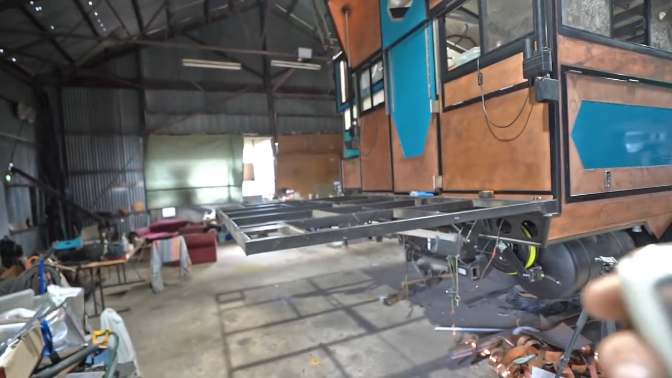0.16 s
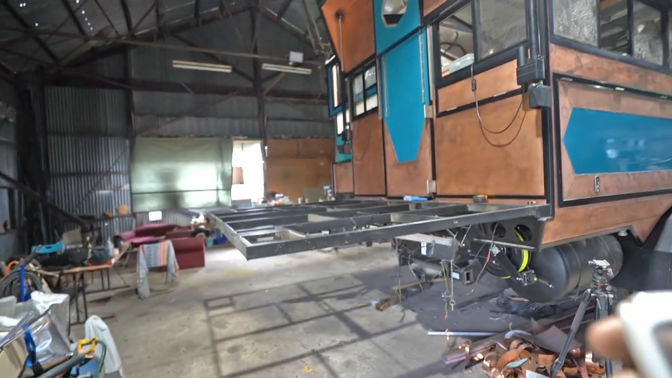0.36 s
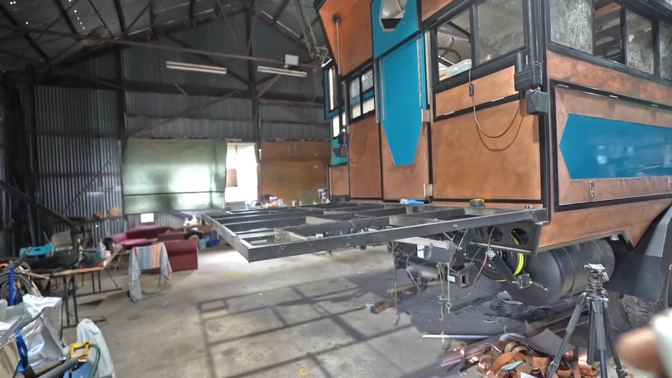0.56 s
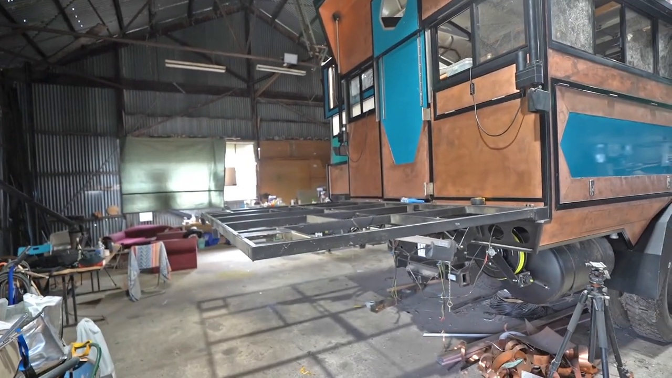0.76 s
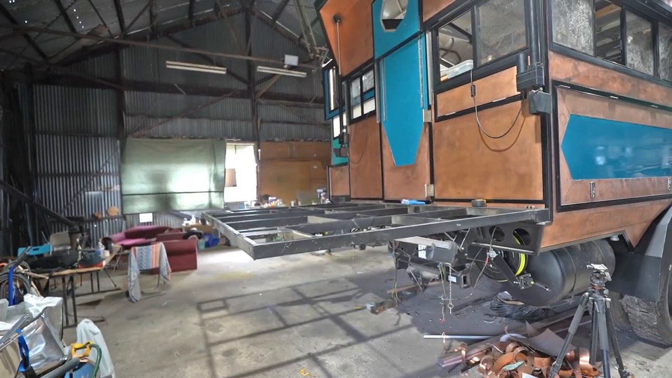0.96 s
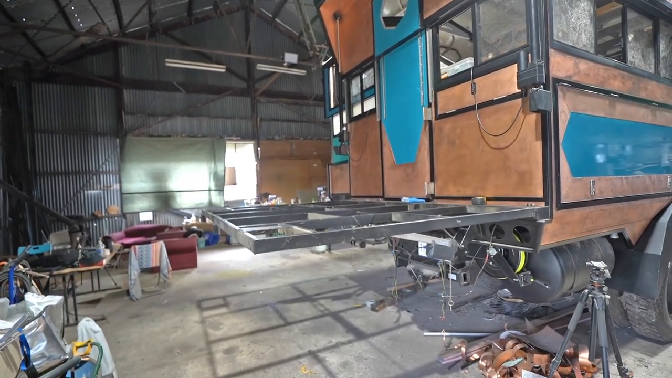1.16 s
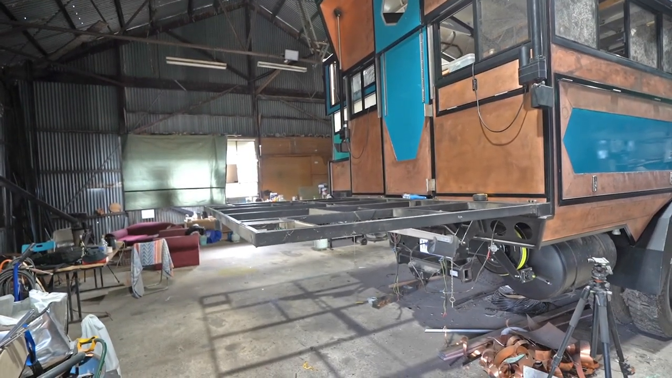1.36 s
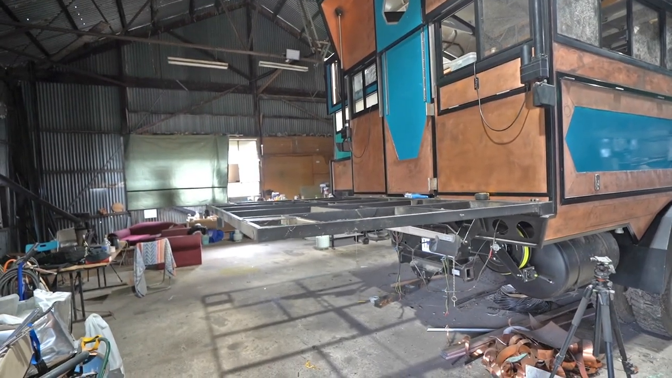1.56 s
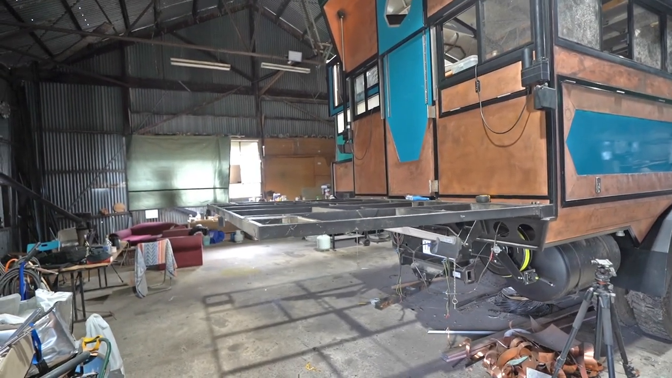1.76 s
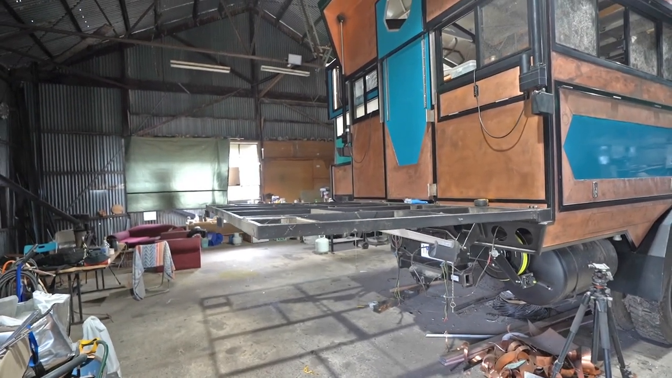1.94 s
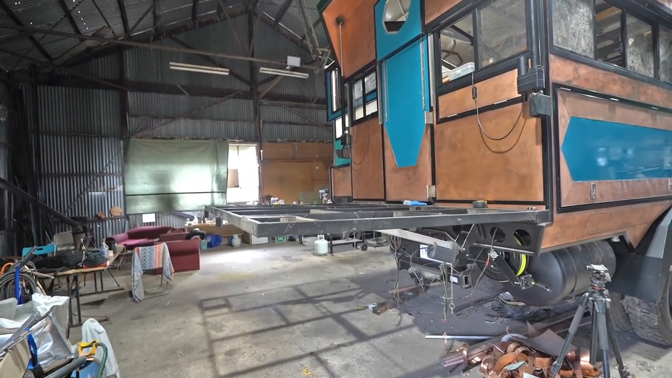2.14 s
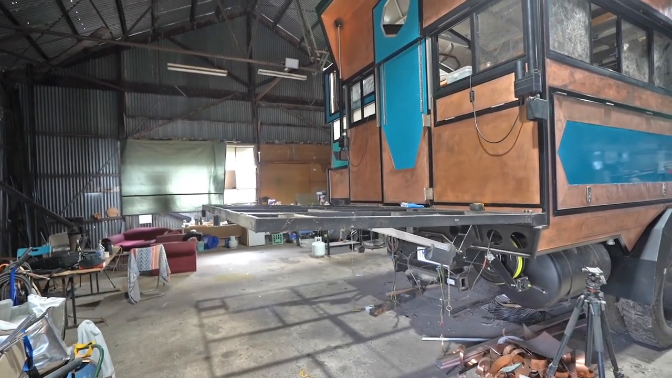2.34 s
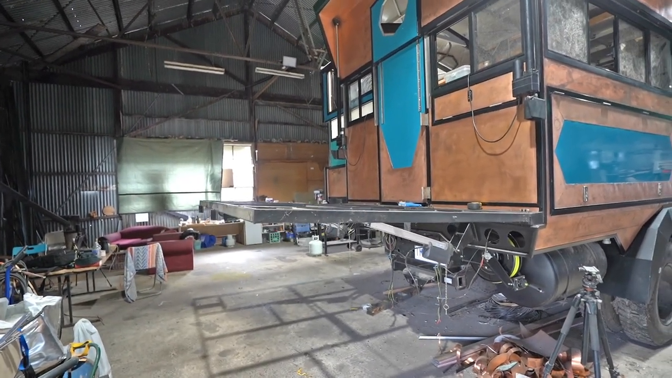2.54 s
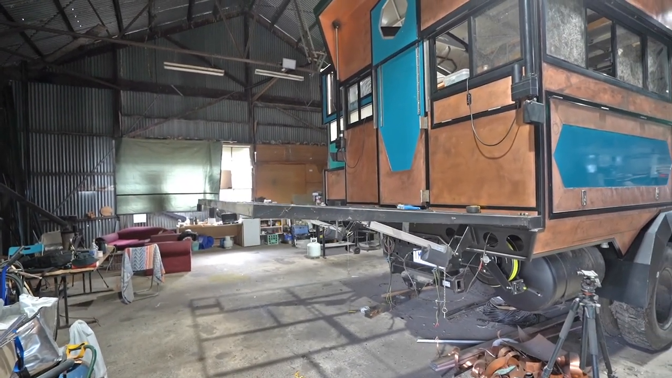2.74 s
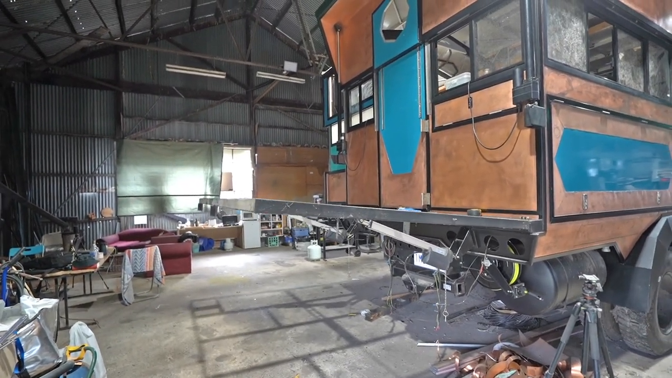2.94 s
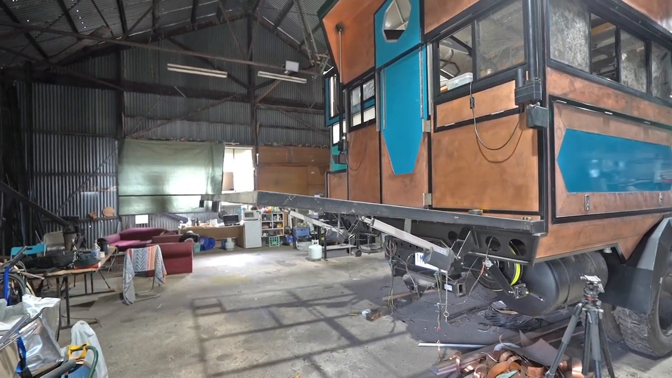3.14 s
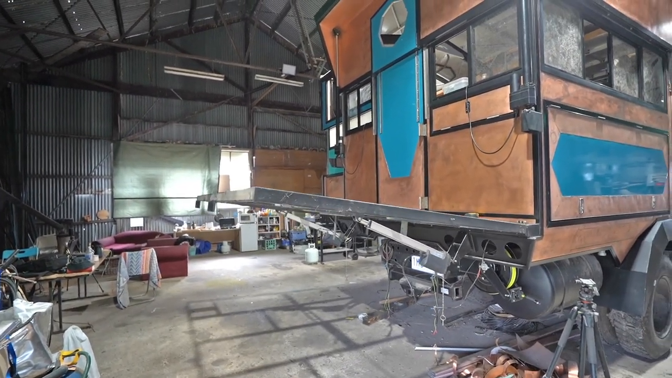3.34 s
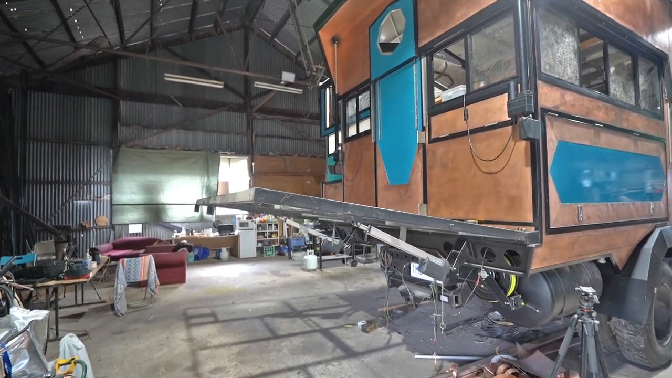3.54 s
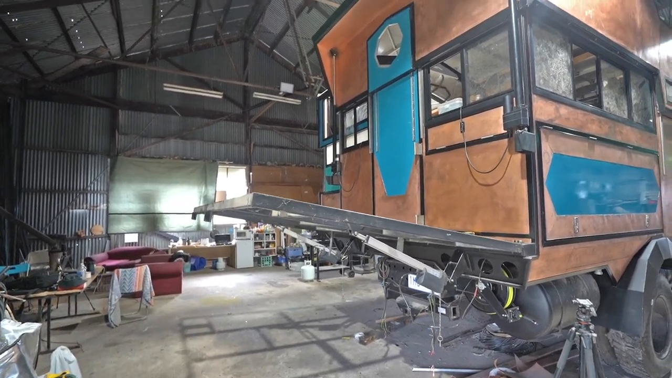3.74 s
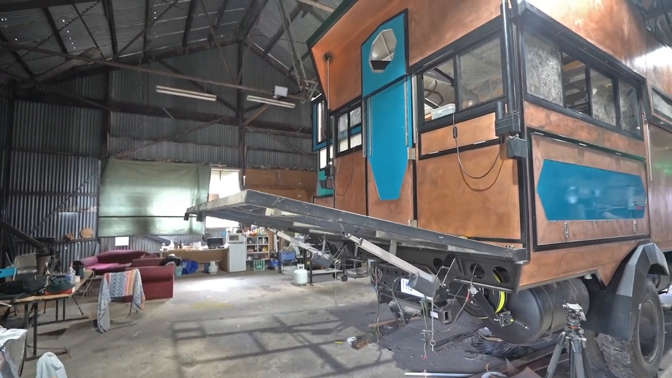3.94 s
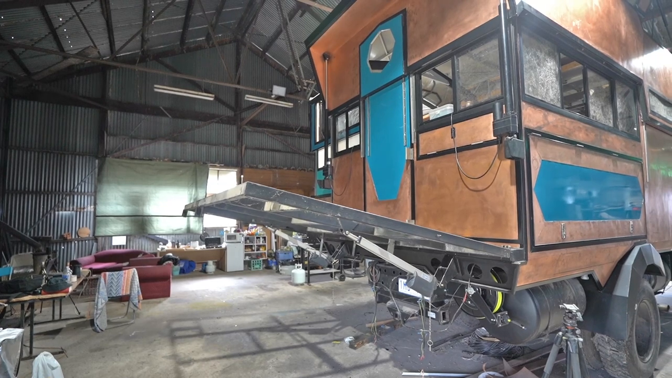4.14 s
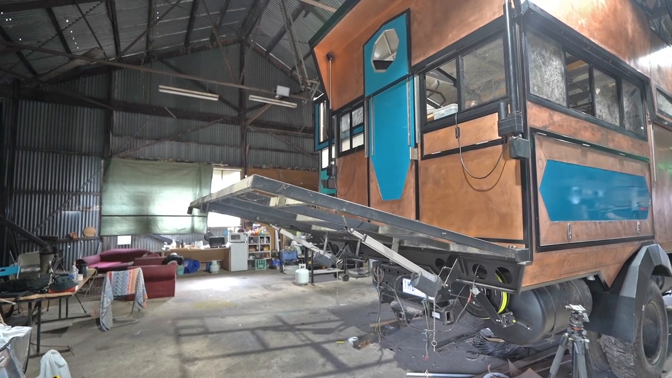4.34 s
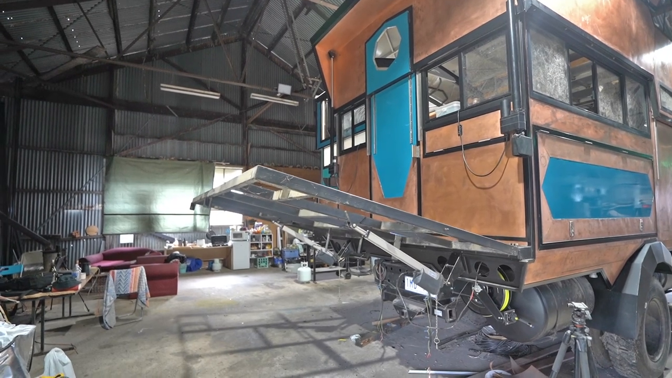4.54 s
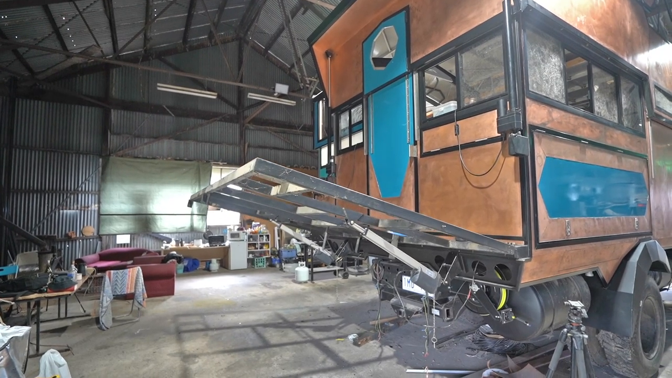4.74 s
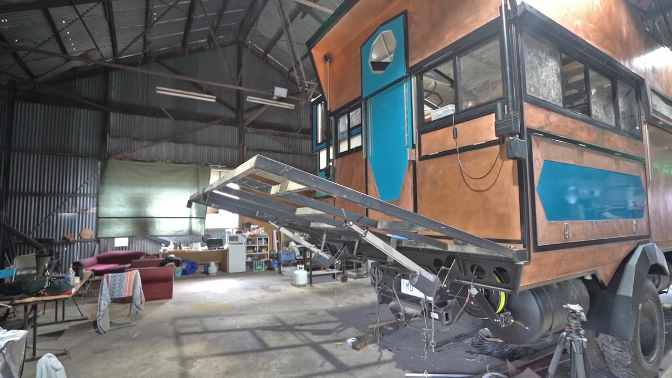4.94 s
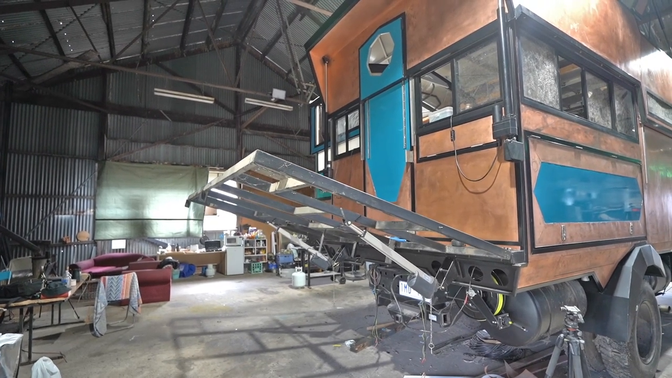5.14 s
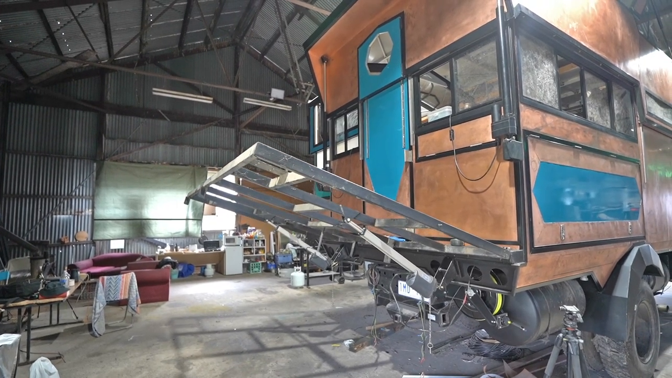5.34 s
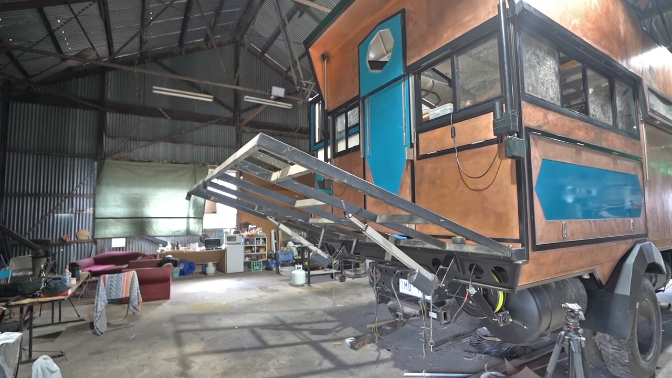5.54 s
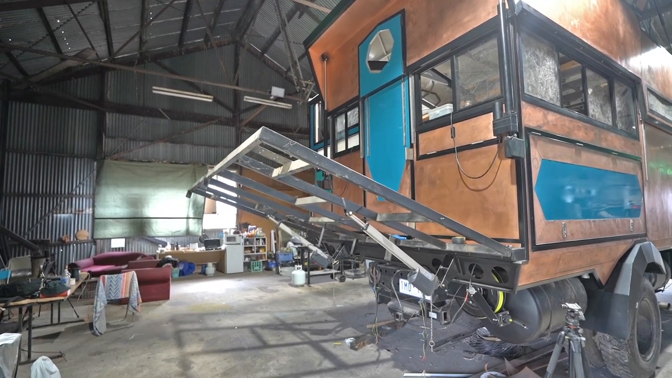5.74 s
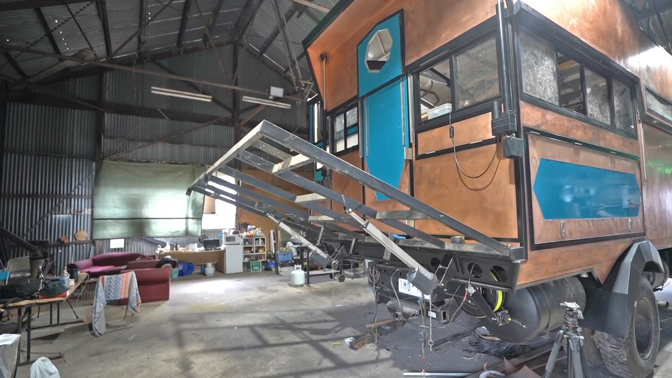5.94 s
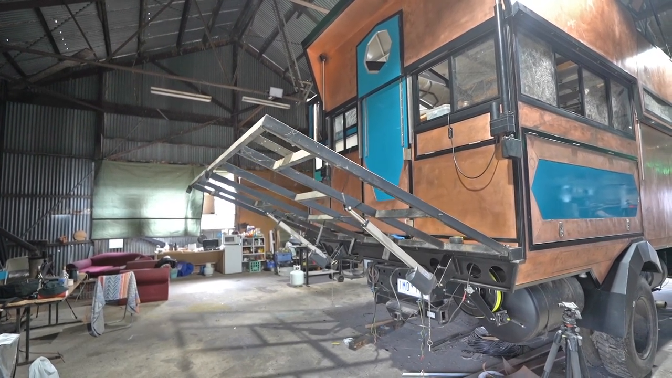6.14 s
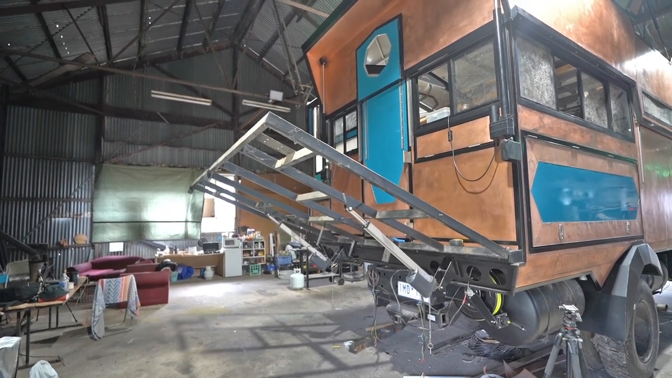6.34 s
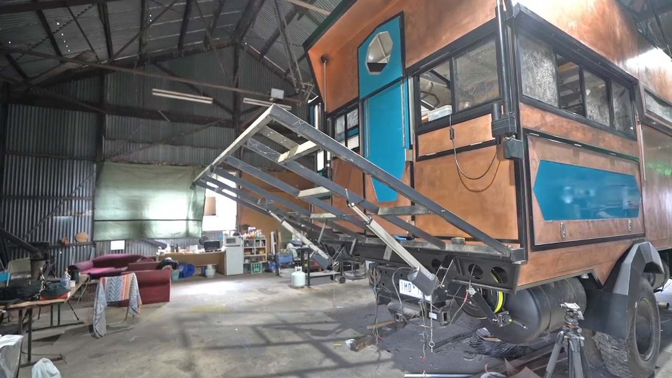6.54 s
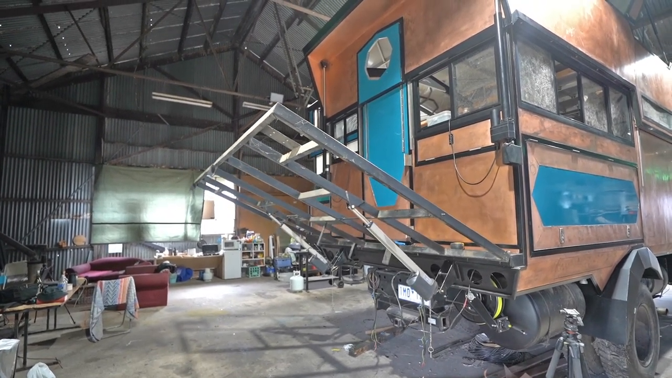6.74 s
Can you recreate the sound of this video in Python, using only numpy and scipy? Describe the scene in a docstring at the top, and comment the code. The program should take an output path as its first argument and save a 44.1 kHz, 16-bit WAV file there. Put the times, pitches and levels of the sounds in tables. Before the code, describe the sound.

Electric actuators click on, clank and spin up into a steady whine that jumps higher as they raise a steel frame.

```python
"""Two electric linear actuators spin up and raise a steel frame in a sheet-metal workshop.
Fingers rustle on a remote, a button and relays click, and the drive clanks into motion: gear teeth
whine through the ringing gearbox while brushes and lead screw rasp. Later the frame booms on its hinges.
Underneath lie rumbling air, a steady machine hum and a far engine slowing down.
From 2.245 s everything plays in fast-forward: twice the speed, one octave higher."""
import sys
import numpy as np
from scipy import signal
from scipy.fft import rfft, irfft, next_fast_len
from scipy.io import wavfile
from scipy.ndimage import map_coordinates

SR = 44100
rng = np.random.default_rng(int(sys.argv[2]) if len(sys.argv) > 2 else 0)


def dump(signal):
    """Clip the signal to [-1, 1] and save it as 16-bit WAV at the path in sys.argv[1]."""
    limited = np.clip(np.atleast_2d(signal).T, -1, 1)
    pcm = np.round(limited * 32767).astype(np.int16)
    wavfile.write(sys.argv[1], SR, pcm)


N = 303628

# Cue times and the beat rate are in playback time; pitches and decays are those at natural speed.
FAST_FROM_S = 2.245
CUT = round(FAST_FROM_S * SR)
LENGTH = CUT + 2 * (N - CUT)  # samples at natural speed
CLOCK = np.concatenate([np.arange(CUT), CUT + np.arange(LENGTH - CUT) / 2]) / SR  # playback time [s]


def amp(db):
    """Decibels to gain."""
    return 10 ** (np.asarray(db) / 20)


def unit(x):
    """Scale to rms 1."""
    return x / np.sqrt(np.mean(x ** 2) + 1e-20)


def along(points, hz):
    """Read (frequency [Hz], value) points on a log axis."""
    freqs, values = np.transpose(points)
    return np.interp(np.log(hz + 1), np.log(freqs + 1), values)


def curves(rows):
    """Automation: one value per sample for each column after the time."""
    times, *columns = np.transpose(rows)
    return [np.interp(CLOCK, times, column) for column in columns]


def wobble(rate):
    """A smooth random curve, rate knots a second."""
    knots = rng.standard_normal(int(LENGTH * rate / SR) + 4)
    coarse = np.arange(0, LENGTH, 64)
    return np.interp(np.arange(LENGTH), coarse, map_coordinates(knots, [coarse * rate / SR]))


def swell_at(s, length_s):
    """A smooth swell of height 1 around playback time s."""
    return np.exp(-(2 * (CLOCK - s) / length_s) ** 2)


def filtered(x, response):
    """Shape x by a gain that depends on frequency."""
    size = next_fast_len(len(x) + 8192, real=True)
    return irfft(rfft(x, size) * response(np.fft.rfftfreq(size, 1 / SR)), size)[:len(x)]


def eq(x, points):
    """Shape x by (frequency [Hz], level [dB]) points."""
    return filtered(x, lambda f: amp(along(points, f)))


def resonance(hz, width):
    """Response of one damped mode."""
    return lambda f: 1j * f * width / (hz * hz - f * f + 1j * f * width)


def burst(response, t60):
    """One second of coloured noise that dies away."""
    t = np.arange(SR) / SR
    return unit(filtered(rng.standard_normal(SR), response)) * np.exp(-np.log(1000) * t / t60)


def add(track, s, sound):
    """Mix a sound in at playback time s."""
    part = track[np.searchsorted(CLOCK, s):][:len(sound)]
    part += sound[:len(part)]


# room tone of the shed: (frequency [Hz], relative level [dB])
AIR_SPECTRUM = [(4, -1.5), (12, 7), (22, -0.5), (35, -13), (70, -10.5), (170, -16.5), (240, -10.5),
                (350, -17.5), (750, -20), (1400, -29), (2800, -38.5), (5600, -43.5), (10000, -50),
                (15000, -62)]


def room_air(level_db):
    """Still air lays a bed of low rumble."""
    return amp(level_db) * unit(eq(rng.standard_normal(LENGTH), AIR_SPECTRUM))


def machine_hum(hz, level_db):
    """A machine holds one low note, gently wavering in level."""
    return amp(level_db + 1.8 * wobble(1.57)) * unit(np.sin(2 * np.pi * hz * np.arange(LENGTH) / SR))


# the engine's wind-down: (time [s], firing rate [Hz], level [dB])
ENGINE_SLOWDOWN = [(2.4, 65.6, -62), (4.1, 62.9, -52), (5.2, 59.89, -54), (5.9, 56.42, -46.5),
                   (6.4, 54.6, -46.5), (6.88, 51.3, -44)]


def far_engine():
    """Distant firing blurs into a drone that sinks, grows louder and opens up its octave late on."""
    firing_hz, level_db = curves(ENGINE_SLOWDOWN)
    angle = 2 * np.pi * np.cumsum(firing_hz) / SR
    octave = amp(np.interp(CLOCK, [6.1, 6.4], [-12, 1])) * np.sin(2 * angle)
    return amp(level_db + 1.6 * wobble(4)) * (np.sin(angle) + octave)


# fingers shift on the remote control: (time [s], length [s], level [dB])
FINGER_RUBS = [(0.02, 0.13, -48.5), (0.32, 0.2, -55)]


def finger_rustle():
    """Skin rubs on plastic with a faint, grainy rustle."""
    pressure = sum(amp(db) * swell_at(s, length_s) for s, length_s, db in FINGER_RUBS)
    grains = rng.standard_normal(LENGTH) * amp(2.1 * wobble(153))
    plastic = [(200, -20), (500, 11), (1200, -19), (2800, -11), (7000, -20), (15000, -42)]
    return pressure * unit(eq(grains, plastic))


# button and relay cues: (time [s], peak level [dB], pitch [Hz], half width [Hz], decay t60 [s])
SWITCH_CLICKS = [(0.6253, -25.5, 1350, 170, 0.0038), (.626, -42, 4200, 500, .004),
                 (0.7272, -34, 6500, 7000, .006), (.7725, -34, 6000, 4940, .008)]


def switch_clicks():
    """The button and the relays snap shut, close and dry."""
    out = np.zeros(LENGTH)
    t = np.arange(SR // 20) / SR
    for s, db, hz, half_width, t60 in SWITCH_CLICKS:
        snap = rng.standard_normal(len(t)) * np.exp(-np.log(1000) * t / t60)
        click = filtered(snap, lambda f: resonance(hz, 2 * half_width)(f) ** 2)
        add(out, s, amp(db) * click / np.abs(click).max())
    return out


START_S, START_HZ, RAMP_HZ_PER_S = 0.785, 223, 548  # switch-on, first mesh rate, its climb
WHEEL_TEETH, PINION_TEETH = 105, 35
# running speed, sagging a little under the frame's weight: (time [s], tooth mesh rate [Hz])
RUNNING_SPEED = [(1.6, 518.8), (2.3, 516.7), (2.85, 520.3), (3.4, 521.4), (4.1, 516.2), (4.7, 515.8),
                 (6.7, 518.8)]


def mesh_rate():
    """Tooth meshes per second: a straight ramp that levels off at running speed."""
    running_hz, = curves(RUNNING_SPEED)
    return np.minimum(START_HZ + RAMP_HZ_PER_S * np.maximum(CLOCK - START_S, 0), running_hz)


def spin_up(speed, db_per_octave, attack_s):
    """Level in dB relative to full running: an attack at switch-on, then louder with speed."""
    attack = 1 - np.exp(-np.maximum(CLOCK - START_S, 0) / attack_s)
    return 20 * np.log10(attack + 1e-9) + db_per_octave * np.log2(speed)


def beating(depth_db, first_hz, doubles_s, phase_turns):
    """Slow swell of the whine in dB, quickening as the two motors drift apart."""
    turns = np.cumsum(first_hz * 2 ** (CLOCK / doubles_s) * np.gradient(CLOCK))
    return depth_db * np.cos(2 * np.pi * (turns + phase_turns))


# ring of gearbox and tube: (frequency [Hz], half width [Hz], boost [dB])
HOUSING_MODES = [(308, 8.8, 0), (821, 25, 6.5), (915, 35, 7), (1257, 22, 6), (1494, 10, 11),
                 (1613, 34, 3.5), (1770, 47, 6), (2044, 55, 4), (2670, 50, 5.5), (3196, 50, 7),
                 (3410, 53, 6), (3700, 71, 6.5), (4170, 47, 2), (4610, 126, 6.5)]


def housing(colour):
    """Response of a spectrum lifted by the gearbox resonances."""
    def response(f):
        boost_db = sum(db / (1 + ((f - hz) / half_width) ** 2) for hz, half_width, db in HOUSING_MODES)
        return amp(along(colour, f) + boost_db)
    return response


# tone colour of the tooth impacts: (frequency [Hz], relative level [dB])
TOOTH_SPECTRUM = [(40, -26), (130, -26.5), (300, -15.5), (520, 0), (1040, -4), (1560, -9.5), (2100, -12.5),
                  (3100, -12.5), (4650, -20.5), (6000, -35), (15500, -45)]


def gear_buzz(teeth, memory, fresh, spread_db):
    """Each tooth strikes the housing; the wear pattern returns with every turn of the wheel."""
    hits = np.interp(np.arange(1, int(teeth[-1])), teeth, np.arange(LENGTH))
    # neighbouring teeth are worn alike, so the force drifts round the wheel
    lag = np.exp(-2j * np.pi * np.fft.rfftfreq(WHEEL_TEETH))
    phases = np.exp(2j * np.pi * rng.random(len(lag)))
    wear = unit(irfft(phases / (1 - memory * lag), WHEEL_TEETH))
    chance = unit(signal.lfilter([1], [1, -memory], rng.standard_normal(len(hits))))
    force = np.resize(wear, len(hits)) + fresh * chance
    force *= amp(spread_db * rng.standard_normal(len(hits)))
    # windowed sinc pulses land between samples and keep the pitch clean
    taps = hits.astype(int)[:, None] + np.arange(-7, 9)
    offset = taps - hits[:, None]
    pulses = force[:, None] * np.sinc(offset) * np.cos(np.pi * offset / 16) ** 2
    train = np.bincount(np.clip(taps, 0, LENGTH - 1).ravel(), pulses.ravel(), LENGTH)
    return unit(filtered(train, housing(TOOTH_SPECTRUM)))


# tone colour of brushes and lead screw: (frequency [Hz], relative level [dB])
RASP_SPECTRUM = [(40, -41), (130, -20.5), (300, 0), (700, -25.5), (1000, -1.5), (1400, -13), (2000, -3.5),
                 (3700, -6.5), (4900, -11.5), (6200, -17), (7200, -18), (8200, -14.5), (10500, -37.5),
                 (13000, -33), (15500, -48)]


def screw_rasp(teeth, rub_db, rub_phase_turns, chatter_db, split_hz):
    """Brushes and screw rasp; the bright part swells once per turn of the pinion."""
    tightness = ((1 + np.cos(2 * np.pi * (teeth / PINION_TEETH - rub_phase_turns))) / 2) ** 2
    rough = np.interp(teeth, np.arange(WHEEL_TEETH), rng.standard_normal(WHEEL_TEETH), period=WHEEL_TEETH)
    friction = rng.standard_normal(LENGTH) * amp(chatter_db * rough)
    rasp = unit(filtered(friction, housing(RASP_SPECTRUM)))
    dull = filtered(rasp, lambda f: 1 / (1 + (f / split_hz) ** 4))
    bright = (rasp - dull) * amp(rub_db * (tightness - 0.69) + 1.3 * wobble(22))
    return unit(dull + bright)


# partials of the gear wheel: (pitch [multiples of its turning rate], relative level [dB])
WHEEL_PARTIALS = [(60, -14), (87, -19), (96, -12), (102, -4), (105, -4.5), (106, -15.5), (108, -8.5),
                  (111, -11.5), (117, -13), (164, -15.5), (189, -15.5), (207, -9), (212, -14.5), (216, -10),
                  (358, -22), (424, -14)]


def wheel_whine(teeth):
    """The turning wheel sings clean tones, each swelling a little on its own."""
    angle = 2 * np.pi * teeth / WHEEL_TEETH
    tones = sum(amp(db + 0.9 * wobble(2.31)) * np.sin(order * angle + 2 * np.pi * rng.random())
                for order, db in WHEEL_PARTIALS)
    return eq(unit(tones), [(180, -27), (285, -0.5)])  # the small gearbox radiates little bass


# the drive takes up its slack in jerks: (time [s], level [dB], decay t60 [s])
SLACK_CLANKS = [(.785, -28, 0.21), (.853, -20, 0.15), (.953, -25.5, 0.15), (1.135, -19, 0.13)]


def slack_clanks():
    """Metal knocks as gears and pins engage."""
    out = np.zeros(LENGTH)
    metal = [(100, 2), (400, 7.5), (2000, -0.5), (4500, -5), (6000, -15), (8300, -10), (15000, -57)]
    for s, db, t60 in SLACK_CLANKS:
        add(out, s, amp(db) * burst(housing(metal), t60))
    return out


# reverb tail of the shed: (frequency [Hz], decay t60 [s])
SHED_DECAY = [(150, 1), (1500, 0.61), (10000, 0.38)]


def echoes(tail_db, near_db, near_t60):
    """Quick scatter off floor and chassis, then the longer answer of the metal walls."""
    hz, t, spectrum = signal.stft(rng.standard_normal(SR), SR, nperseg=256)
    decay = np.exp(-np.log(1000) * t / along(SHED_DECAY, hz)[:, None])
    tail = signal.istft(spectrum * decay, SR, nperseg=256)[1][:SR]
    near = burst(np.ones_like, near_t60)
    return amp(tail_db) * tail / np.linalg.norm(tail) + amp(near_db) * near / np.linalg.norm(near)


def in_shed(x, tail_db=-2.5, near_db=-5, near_t60=0.058, shift_hz=0.3017):
    """Direct sound plus echoes whose paths shift as the frame rises, at unchanged power."""
    first, second = (signal.fftconvolve(x, echoes(tail_db, near_db, near_t60))[:LENGTH] for _ in range(2))
    shift = 2 * np.pi * (np.arange(LENGTH) / SR * shift_hz + rng.random())
    wet = np.cos(shift) * first + np.sin(shift) * second
    return (x + wet) / np.sqrt(1 + amp(tail_db) ** 2 + amp(near_db) ** 2)


def gear_throb(x, teeth, hz, half_width_hz, depth, gear_ratio, phase_turns):
    """A second gear runs out of true: one band of the whine swells once in each of its turns."""
    band = filtered(x, lambda f: 1 / (1 + ((f - hz) / half_width_hz) ** 4))
    turns = gear_ratio * teeth / WHEEL_TEETH
    return x + band * depth * np.cos(2 * np.pi * (turns - phase_turns))


def actuators():
    """Two gear motors share the load and run slightly out of step."""
    mesh_hz = mesh_rate()
    speed = mesh_hz / mesh_hz.max()
    twin_hz = mesh_hz * (1.001 + 0.002005 * wobble(1.5) - 0.1 * (1 - speed))  # lags during spin-up
    teeth, twin_teeth = np.cumsum(mesh_hz) / SR, np.cumsum(twin_hz) / SR  # teeth meshed so far
    whine_db = spin_up(speed, db_per_octave=4.5, attack_s=0.061)
    whine_db += beating(depth_db=0.56, first_hz=0.2008, doubles_s=1.4, phase_turns=0.41)
    whine_db -= 2 * swell_at(3.82, length_s=0.28)  # the level dips briefly
    gears = [amp(whine_db - 23.5) * gear_buzz(count, memory=0.61, fresh=0.57, spread_db=1.3)
             for count in (teeth, twin_teeth)]
    rasp_db = -21.6 + spin_up(speed, db_per_octave=13, attack_s=0.004)
    rasp_db += 0.18 * (CLOCK - START_S)  # the screw rasps more as it runs out
    screw = amp(rasp_db) * screw_rasp(teeth, rub_db=5.5, rub_phase_turns=0.59, chatter_db=1, split_hz=1340)
    tones = amp(whine_db - 21 - 7.5 * (1 - speed)) * wheel_whine(teeth)  # cleanest near full speed
    # gears and screw each sit at their own place and have their own echoes
    drive = tones + sum(in_shed(part) for part in gears + [screw + slack_clanks()])
    return gear_throb(drive, teeth, hz=1030, half_width_hz=170, depth=0.28,
                      gear_ratio=0.968, phase_turns=0.47)


# dull booms of the rising frame: (time [s], level [dB], pitch [Hz], decay t60 [s])
FRAME_BOOMS = [(4.361, -28, 104, 1.2), (4.68, -36.5, 130, 2.9), (4.72, -32, 39.93, 0.72)]


def frame_booms(attack_s=0.037):
    """The frame shifts on its hinges with low, soft-edged booms."""
    out = np.zeros(LENGTH)
    attack = 1 - np.exp(-np.arange(SR) / SR / attack_s)
    for s, db, hz, t60 in FRAME_BOOMS:
        add(out, s, amp(db) * attack * burst(lambda f: resonance(hz, 0.8 * hz)(f) ** 2, t60))
    return out


def scene():
    """The workshop in mono at natural speed, then in fast-forward."""
    action = actuators() + finger_rustle() + switch_clicks() + frame_booms()
    bed = room_air(level_db=-41.7) + machine_hum(hz=93.2, level_db=-45.5) + far_engine()
    mix = action + bed
    fast = signal.resample_poly(mix[CUT:], 1, 2)
    return np.concatenate([mix[:CUT], fast])[None, :N]


def record(dry):
    """A soft clip rounds the highest peaks and a steep low-pass trims the very top."""
    ceiling, top_hz = 0.78, 15750
    rounded = dry / (1 + np.abs(dry / ceiling) ** 6) ** (1 / 6)
    return np.array([filtered(channel, lambda hz: (1 - np.tanh((hz - top_hz) / 50)) / 2)
                     for channel in rounded])


dry = scene()
out = record(dry)
dump(out)
```